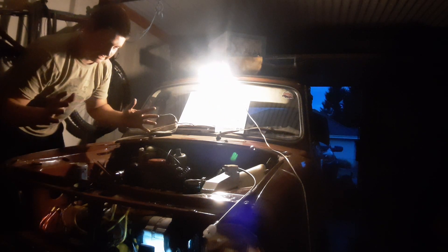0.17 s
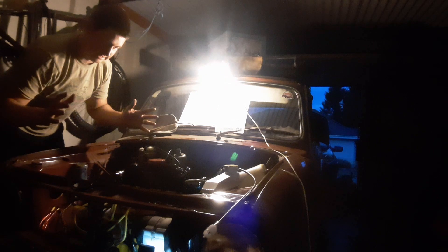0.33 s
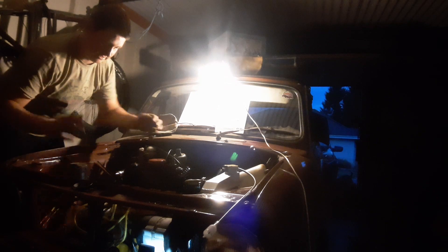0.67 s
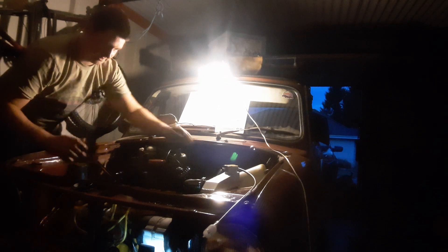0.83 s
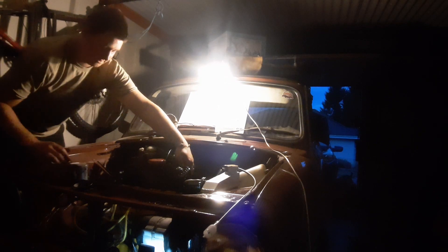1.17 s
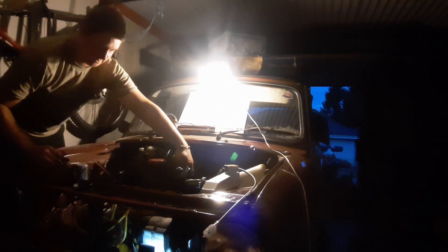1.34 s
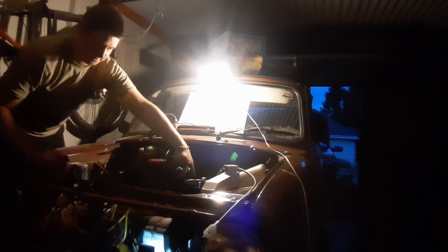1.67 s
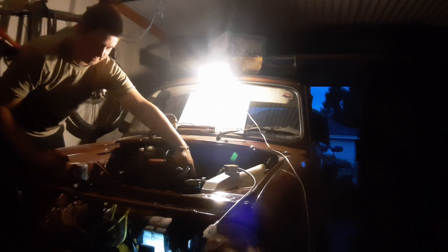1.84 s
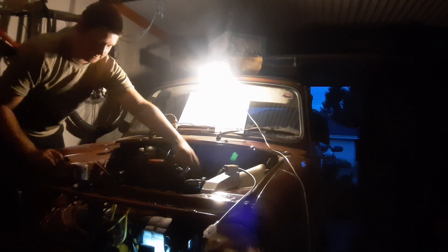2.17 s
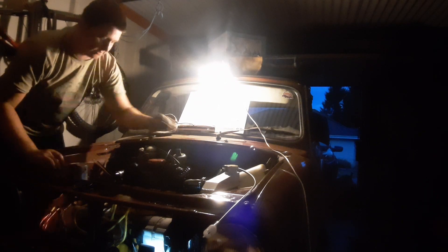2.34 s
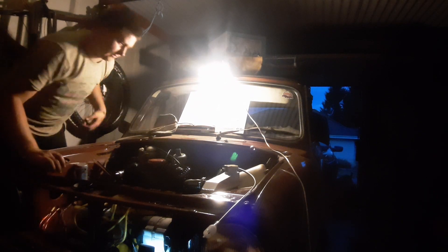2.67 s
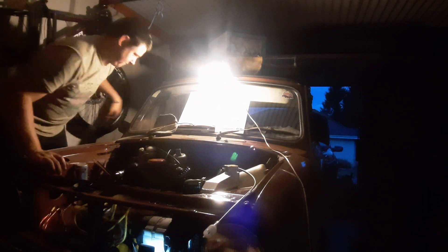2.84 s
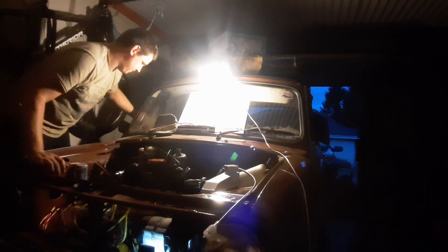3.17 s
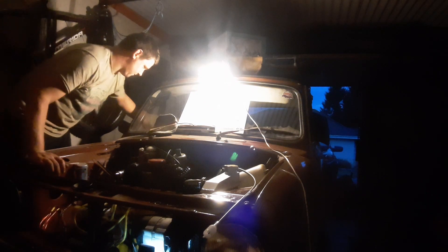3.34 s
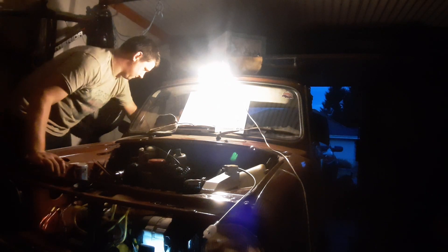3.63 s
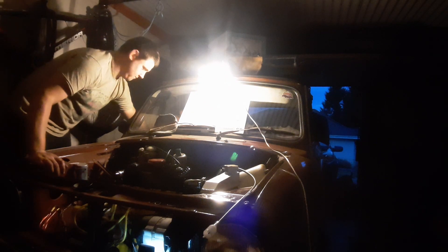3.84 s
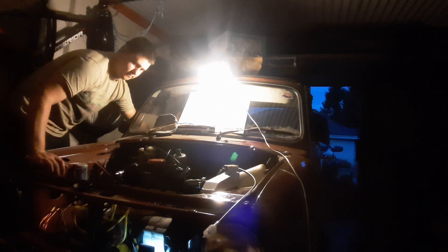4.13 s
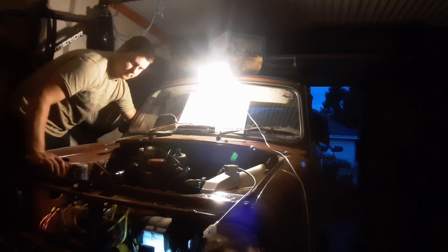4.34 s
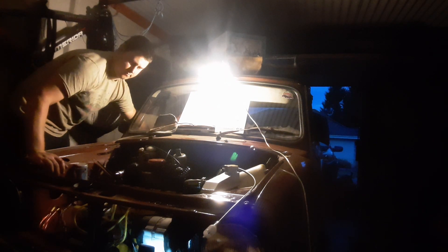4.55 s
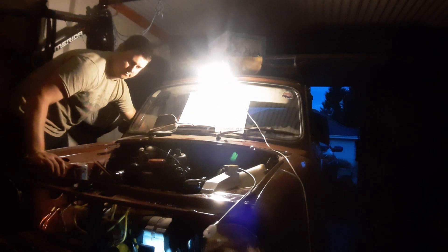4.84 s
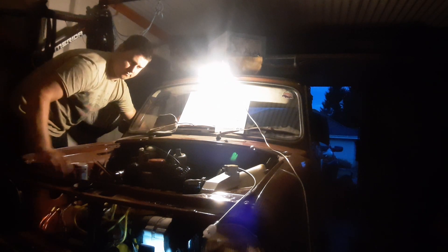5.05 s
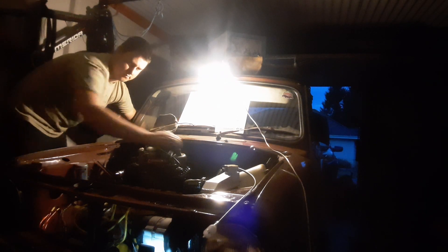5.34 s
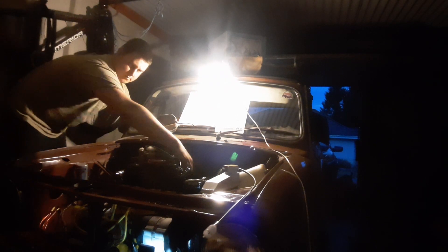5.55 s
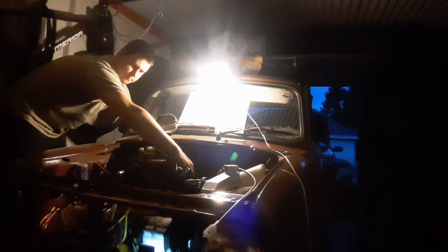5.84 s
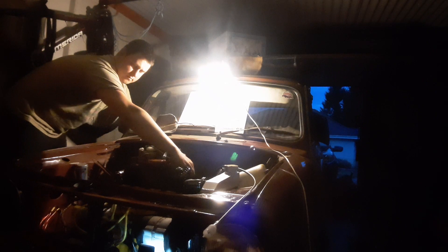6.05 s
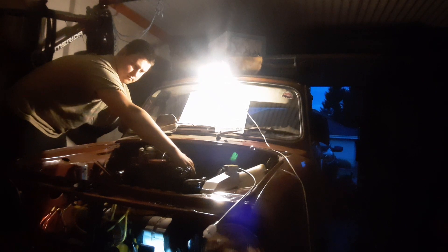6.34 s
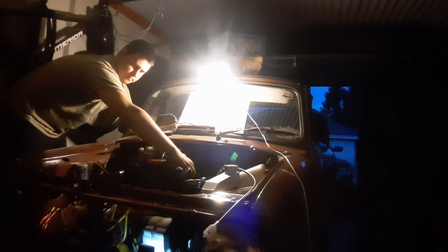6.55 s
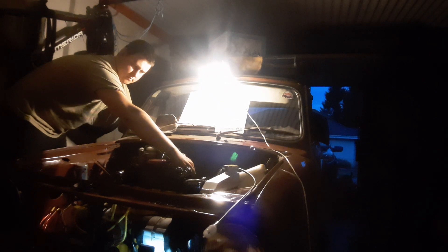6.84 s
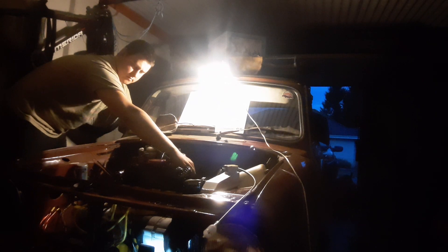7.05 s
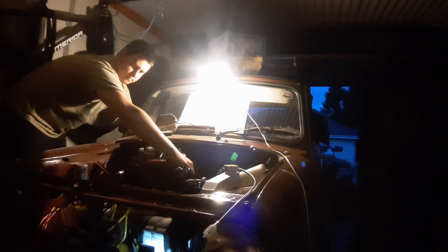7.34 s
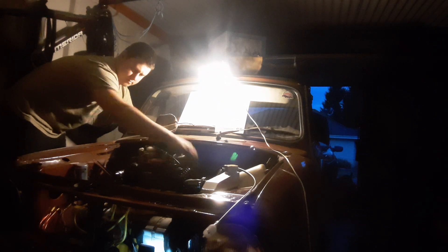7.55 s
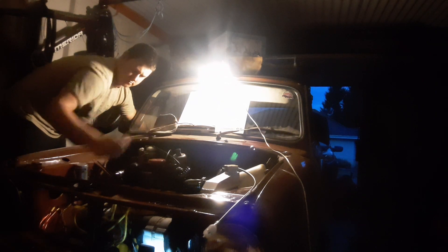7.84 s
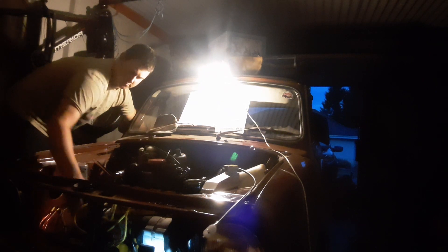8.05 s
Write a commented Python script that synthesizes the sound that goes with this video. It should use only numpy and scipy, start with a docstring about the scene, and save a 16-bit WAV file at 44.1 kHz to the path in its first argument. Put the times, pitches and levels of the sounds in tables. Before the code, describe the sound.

Close stereo pickup of a rough little engine in a short, dense garage echo. It stumbles with low exhaust throbs and ticking metal, then dies around two seconds with a double clack. Quiet follows, with barely audible bumps and a sleeve brush. A toothy, whining starter scrapes for under a second; the engine fires, roars up in two surges, crackles once, falls back and idles faintly.

```python
"""Restarting a small car engine

An old twin-cylinder engine in a garage, bonnet open, stumbles at idle and stalls with a knock. Someone leans in
at the window, the starter grinds, the engine catches, is revved, spits through the carburettor and idles weakly.
Firing pulses excite exhaust resonances; filtered noise, pulsing once a turn, makes block, valve gear and intake air.
Rough contacts are dense random impacts, and struck or hollow parts are noise through narrow resonances."""
import sys
import numpy as np
from scipy import signal
from scipy.fft import rfft, irfft
from scipy.io import wavfile
from scipy.ndimage import uniform_filter1d

SR = 44100
rng = np.random.default_rng(int(sys.argv[2]) if len(sys.argv) > 2 else 0)


def unload_audio(sound):
    """Save the sound as a 16-bit wav file, at the path given as the first command line argument."""
    columns = np.transpose(np.atleast_2d(sound))
    # keep every value between -1 and 1, then stretch to whole-number steps
    steps = np.round(np.clip(columns, -1, 1) * 32767)
    wavfile.write(sys.argv[1], SR, steps.astype(np.int16))


N = 361619
TIME = np.arange(N) / SR  # s

# All table levels are relative: later gains and filters act on them too.
# spectrum of valve gear and intake air: (frequency [Hz], level [dB])
CLATTER_SPECTRUM = [(300, -22), (900, -11), (1200, -2.5), (1550, -2.5), (1850, -10.5), (2400, -2),
                    (2850, 2.5), (3400, -1), (4000, 0), (6000, -1), (7400, 2.5), (8200, -8), (12500, -6),
                    (16000, -7.5)]


def undb(db):
    """Decibels to amplitude: 20 dB is a factor of ten."""
    return 10 ** (np.asarray(db) / 20)


def unit(x):
    """Normalise the effective value: scale to rms 1."""
    return x / np.sqrt(np.mean(x ** 2))


def noise():
    """Diffuse field: white noise whose left and right agree in the bass, less so in the treble."""
    blend_hz = 1110  # below this the sides are alike
    mid, side = rng.standard_normal((2, N))
    side = undb(-2.5) * signal.lfilter(*signal.butter(1, blend_hz, "high", fs=SR), side)
    return np.array([mid + side, mid - side]) / np.sqrt(1.7)


def walk(size):
    """Low-passed chance: a smooth wander of rms 1; size is its time scale in samples."""
    smooth = uniform_filter1d(rng.standard_normal(N), size)
    return unit(uniform_filter1d(smooth, size))


def grit(rate, spread_db):
    """Dry friction as a shot process: dense tiny impacts of uneven size, rate per second, rms 1."""
    impacts = rng.random(N) < rate / SR
    return unit(impacts * noise() * undb(spread_db * noise()))


def steady(x, size=6000):
    """Slow gain control: even out slow level changes (window in samples), keep the faster beats."""
    power = np.mean(np.atleast_2d(x) ** 2, axis=0)
    slow_power = uniform_filter1d(uniform_filter1d(power, size), size)
    return x / np.sqrt(slow_power + 1e-4 * power.mean())


def colour(x, points):
    """Minimum-phase filtering: a causal filter with the (Hz, dB) outline and unit power gain."""
    hz, db = np.transpose(points)
    size = 4096
    bins_hz = np.arange(size // 2 + 1) * SR / size
    gain = undb(np.interp(np.log(bins_hz + 1), np.log(hz), db))
    # folding the cepstrum onto positive times makes the response causal
    cepstrum = irfft(np.log(gain))[:size // 2]
    cepstrum[1:] *= 2
    response = irfft(np.exp(rfft(cepstrum, size)))
    return signal.fftconvolve(x, response[None] / np.linalg.norm(response), axes=1)[:, :N]


def ring(x, modes):
    """Modal superposition: parallel resonances (frequency [Hz], width [Hz], level [dB])."""
    return sum(undb(db) * signal.lfilter(*signal.iirpeak(hz, hz / width, SR), x) for hz, width, db in modes)


def fader(s, db):
    """Piecewise exponential gain: follows a dB curve, fading quickly outside it."""
    outside = np.maximum(s[0] - TIME, 0) + np.maximum(TIME - s[-1], 0)
    return undb(np.interp(TIME, s, db) - np.minimum(600 * outside, 150))


def swell(s, db, rise_db_per_s, fall_db_per_s, length=0):
    """Exponential growth and decay: gain builds up to db at s, holds for length and dies away."""
    early, late = np.maximum(s - TIME, 0), np.maximum(TIME - s - length, 0)
    return undb(db - np.minimum(rise_db_per_s * early + fall_db_per_s * late, 150))


def bursts(table, rise_s, fall_s):
    """Transient envelopes: events rise exponentially, hold for their length and decay exponentially."""
    out = np.zeros(N)
    for s, db, length in table:
        start = int(s * SR)
        age = TIME[:min(SR // 2, N - start)]
        rise = 1 - np.exp(-age / rise_s)
        fall = np.exp(-np.maximum(age - length, 0) / fall_s)
        out[start:start + len(age)] += undb(db) * rise * fall
    return out


def firings(speed, anchor_s, jitter_s, scatter_db):
    """Pulse train from integrated speed: one a crank turn, jittered. Returns (pulses, time since the last [s])."""
    s, hz = np.transpose(speed)
    turns = np.cumsum(np.interp(TIME, s, hz)) / SR
    turns -= np.interp(anchor_s, TIME, turns)  # before jitter, one pulse falls at anchor_s
    times = np.interp(np.arange(np.ceil(turns[0]), turns[-1]), turns, TIME)
    chance = rng.standard_normal((len(times), 2))
    at = np.sort(np.clip((times + jitter_s * chance[:, 0]) * SR, 0, N - 1).astype(int))
    pulses = np.zeros(N)
    pulses[at] = undb(max(scatter_db, 0) * chance[:, 1])
    last = np.maximum(np.searchsorted(at, np.arange(N), side="right") - 1, 0)
    return pulses, np.abs(TIME - at[last] / SR)


def hunting():
    """Speed instability: each surge swells the boom, then the clatter sags twice. Returns (boom gain, clatter gain)."""
    # a few strong firings: (time [s], boom level [dB], depth of the sag after it [dB], negative for a lift)
    surges = [(.06, -47, 4.5), (.31, -64, -1), (.6, -32.5, 2), (.872, -31.5, 3.5), (1.159, -32, 6),
              (1.472, -51, 11.5), (1.736, -38, 10), (5.04, -30, -3.5), (5.331, -42, -1), (5.53, -31, 0),
              (7.22, -45, 2.5), (7.44, -47.5, 1), (7.72, -38, 0)]
    build_db_per_s, drop_db_per_s = 74.5, 167
    # the crank drags just after a surge, and less deeply one turn later
    lag_s, fall_s, rise_s = 0.064, 0.045, 0.05
    again_s, again_share = 0.091, .38

    def sag(s):
        return np.interp(TIME - s - lag_s, [-fall_s, 0, rise_s], [0, 1, 0])

    boom = sum(swell(s, db, build_db_per_s, drop_db_per_s) for s, db, _ in surges)
    sag_db = sum(depth * (sag(s) + again_share * sag(s + again_s)) for s, _, depth in surges)
    return boom, undb(-sag_db)


def engine(pulses, age, effort, swells, sags):
    """Forced resonance: firings boom in the pipe and knock the block; valve gear and air surge. Returns (boom, bay)."""
    # exhaust resonances: (frequency [Hz], width [Hz], level [dB])
    pipe = [(46.1, 3, 5), (79.2, 5.7, 8.5), (115.2, 4.6, 1), (144.3, 4.3, -1.5)]
    # spectrum of the block knock: (frequency [Hz], level [dB])
    block = [(120, -41.5), (200, -10), (240, -0.5), (330, 0.5), (480, 3), (620, -4), (800, -2), (1000, -7),
             (1250, -2.5), (1700, -9), (3000, -42.5)]
    # ringing covers and panels: (frequency [Hz], width [Hz], level [dB])
    covers = [(325, 68, -13), (714, 59, -2), (1150, 128, -1), (1536, 96, -4), (2990, 170, -8),
              (3464, 84, 0), (6750, 375, -10.5)]
    s, boom_db, knock_db, air_db = np.transpose(effort)

    gas_rush = np.exp(-age / 0.028) * rng.standard_normal(N)
    gas = unit(pulses) + undb(-1.5) * unit(gas_rush)
    boom_band = signal.butter(3, [36, 185], "band", fs=SR, output="sos")
    boom = steady(signal.sosfilt(boom_band, ring(gas, pipe)))

    knock = steady(colour((np.exp(-age / 0.0035) + 0.51) * noise(), block))
    surge = age / 0.012 * np.exp(1 - age / 0.017)
    ticks = grit(rate=5000, spread_db=0.7) + undb(-0.5) * noise()
    clatter = steady(colour((surge + 0.78) * ticks, CLATTER_SPECTRUM))
    # above 7 kHz the hiss sags deeper still
    top = signal.sosfiltfilt(signal.butter(1, 7000, "high", fs=SR, output="sos"), clatter)
    clatter = clatter - top * (1 - sags)
    bay = undb(-1.5) * knock * fader(s, knock_db) * sags ** 0.41 + clatter * fader(s, air_db) * sags

    # loose covers each rattle harder or softer from turn to turn
    rattle = sum(ring(bay, [mode]) * undb(6.4 * np.tanh(0.7 * walk(size=700))) for mode in covers)
    running = fader(s, np.zeros(len(s)))
    return boom * np.hypot(fader(s, boom_db), running * swells), undb(0.5) * (bay + rattle)


def fins(x, width_hz, db, flicker_db, count=18):
    """Sympathetic resonance: thin cooling fins of graded length ring, now one and now another."""
    pitches = np.geomspace(2750, 7400, count) * (1 + 0.0082 * rng.standard_normal(count))
    return sum(ring(x, [(hz, width_hz, db)]) * undb(flicker_db * walk(size=1300)) for hz in pitches)


def starter():
    """Tooth-mesh modulation: pinion teeth scrape the flywheel ring in a whine that sags under load, with clashes."""
    # speed, dragged down by the first compressions: (time [s], mean tooth rate [Hz])
    tooth_speed = [(4.38, 500), (4.43, 646), (4.5, 700), (4.571, 556.6), (4.635, 446.1), (4.75, 378.4),
                   (4.82, 784), (5.1, 861), (5.299, 731.5), (5.55, 504)]
    # spectrum of the scrape: (frequency [Hz], level [dB])
    gears = [(80, -10.5), (230, -9.5), (500, -7.5), (820, 4), (1000, 1.5), (1250, 1.5), (2000, 1),
             (2400, -2), (2900, 3), (4500, -4.5), (5600, 1.5), (7200, -2.5), (8400, -14.5), (15500, -16.5)]
    # the flywheel rings under the pinion: (frequency [Hz], width [Hz], level [dB])
    flywheel = [(656, 25, 2.5), (798, 31, 0.5), (990, 58, -3), (1147, 53, -0.5), (4280, 180, 2.5),
                (5150, 110, -5)]
    # the pinion clashes under each compression: (start [s], level [dB], hold [s])
    clashes = [(4.415, -17.5, 0.014), (4.56, -22, 0.065), (4.72, -26.5, 0.021), (4.867, -21.5, 0.025),
               (4.94, -25, 0.016), (5.05, -24.5, 0.029)]
    # the pinion bites hard and howls: (time [s], level [dB])
    bites = [(4.432, -19.5), (4.637, -26.5)]
    on_s, off_s, attack_s = 4.381, 5.05, 0.025
    # the load eases as the engine takes over
    scrape_db, ease_db_per_s, run_down_db_per_s = -23.5, 6.5, 20
    whine_db = -17  # the whine's share of the load

    s, hz = np.transpose(tooth_speed)
    tooth_hz = np.interp(TIME, s, hz) * (1 + 0.0524 * walk(size=200))
    phase = 2 * np.pi * np.cumsum(tooth_hz) / SR
    scrape = colour(grit(rate=11000, spread_db=3.5) * (1 + .5 * np.cos(phase)), gears)
    ringing = sum(ring(scrape, [mode]) * undb(5.7 * walk(size=1100)) for mode in flywheel)
    scrape = unit(scrape + ringing)
    harmonics = np.sin(phase) + 0.32 * np.sin(2 * phase) + 0.74 * np.sin(3 * phase)
    whine = harmonics * undb(3.1 * walk(size=400))

    age, released = np.maximum(TIME - on_s, 0), np.maximum(TIME - off_s, 0)
    engaged = np.minimum(age / attack_s, 1) ** 2
    load = engaged * undb(scrape_db - ease_db_per_s * age - run_down_db_per_s * released)
    howl = sum(swell(at, db, rise_db_per_s=600, fall_db_per_s=450) for at, db in bites)
    rough = scrape * (load + bursts(clashes, rise_s=0.0017, fall_s=0.0038))
    return rough + whine * (undb(whine_db) * load + engaged * howl)


def spits():
    """Cavity resonance: mixture lights in the intake with a hollow cough, and crackles out of the carburettor."""
    # coughs in the intake: (start [s], level [dB], hold [s])
    coughs = [(4.416, -18.5, 0.02), (4.73, -30.5, 0.028), (7.066, -23, 0.026), (7.138, -21.5, 0.01)]
    # intake resonances: (frequency [Hz], width [Hz], level [dB])
    intake = [(240, 59, 5), (262, 51, -9), (345, 120, 3), (489, 25, -4)]
    # spits back through the carburettor: (start [s], level [dB], hold [s])
    crackles = [(7.107, -14.5, 0.019), (7.139, -21.5, 0.022), (7.158, -21, 0.0066)]
    cough = steady(ring(noise(), intake), size=500) * bursts(coughs, rise_s=0.0089, fall_s=0.0086)
    crackle = colour(grit(rate=11000, spread_db=3.5), CLATTER_SPECTRUM)
    return undb(1.0) * cough + crackle * bursts(crackles, rise_s=0.00079, fall_s=0.01)


def bumps():
    """Impact excitation of modes: rattling contacts ring the engine-bay metal or thud in the door."""
    # metal knocks in the engine bay: (start [s], level [dB], hold [s])
    knocks = [(2.01, -55, 0.039), (2.184, -53.5, 0.025), (2.21, -37, 0.0044), (2.22, -36.5, 0.026),
              (7.54, -34.5, 0.032)]
    # modes of the knocked metal: (frequency [Hz], width [Hz], level [dB])
    knock_modes = [(325, 56, -13), (420, 22, 3), (507, 55, -9), (725, 99, -2.5), (950, 54, -3.5),
                   (1310, 62, -12), (1650, 130, -16), (2700, 420, -6)]
    # dull thumps against the door as someone leans in: (start [s], level [dB], hold [s])
    thumps = [(3.151, -53, 0.013), (3.293, -52.5, 0.032), (3.333, -53, 0.076), (3.655, -51.5, 0.015),
              (3.885, -52.5, 0.011), (4.0, -75, 0.11)]
    # spectrum of a thump: (frequency [Hz], level [dB])
    thump_spectrum = [(60, -19), (120, 3.5), (160, 0.5), (230, -3), (330, 1), (520, -2), (850, -8.5),
                      (1100, -8), (1400, -12), (2000, -25), (8000, -51)]
    # door modes: (frequency [Hz], width [Hz], level [dB])
    door = [(146, 36, 8.5), (800, 69, 6.5), (914, 16, 9)]
    metal = sum(undb(db) * steady(ring(noise(), [(hz, width, 0)]), size=900) for hz, width, db in knock_modes)
    metal = metal * bursts(knocks, rise_s=0.0012, fall_s=0.015)
    thuds = colour(noise() * bursts(thumps, rise_s=.0008, fall_s=0.031), thump_spectrum)
    return undb(-5.5) * metal + undb(-3.5) * (thuds + ring(thuds, door))


def sleeve():
    """Stick-slip friction: cloth fibres catch and slip over the door, stroke by stroke."""
    # strokes: (time of full level [s], level [dB], hold [s])
    stroke_table = [(3.326, -65, .09), (3.5, -70, 0.11), (3.676, -49.5, .18), (4.065, -81, .01),
                    (4.14, -73, .02)]
    # spectrum of the cloth: (frequency [Hz], level [dB])
    cloth = [(100, -16), (160, 0), (240, -8), (700, -2), (1100, -2.5), (1700, -7.5), (2800, -3.5),
             (4200, -2), (6000, -3.5), (7500, -2), (8400, -16), (16000, -11)]
    strokes = sum(swell(s, db, 230, 200, length) for s, db, length in stroke_table)  # rise, fall in dB/s
    return colour(grit(rate=6000, spread_db=1.5), cloth) * strokes


def leak():
    """Jet turbulence: a thin hiss seeps from the stalled engine through a narrow gap as its pressure falls."""
    # spectrum of the hiss: (frequency [Hz], level [dB])
    leak_spectrum = [(3000, -19.5), (4500, -10), (5500, -4), (6600, -6), (7600, -22), (12000, -43)]
    start_s, end_s = 2.23, 2.81
    start_db, fade_db_per_s = -65, 23
    end_db = start_db - fade_db_per_s * (end_s - start_s)
    return colour(noise(), leak_spectrum) * fader([start_s, end_s], [start_db, end_db])


def faint_tones():
    """Narrow-band noise wavers like a rough tone: faint rings fade in and out in the lulls."""
    # as the engine runs down, and before the starter:
    # (start [s], level [dB], hold [s], frequency [Hz], width [Hz])
    tones = [(1.9, -61, 0.17, 1443, 35), (4.27, -74, .12, 830, 110)]
    out = 0
    for s, db, length, hz, width in tones:
        tone = steady(ring(noise(), [(hz, width, 0)]), size=900)
        out = out + tone * bursts([(s, db, length)], rise_s=0.024, fall_s=0.043)
    return out


def from_left(x, lag_s):
    """Interaural delay: the right side hears the source later."""
    return np.array([x[0], np.roll(x[1], int(round(lag_s * SR)))])


def garage(x, t60_s, treble_t60_s, wet_db):
    """Reverberation: close hard walls give a short dense echo in which the treble dies first."""
    age = TIME[:SR // 2]
    echoes = noise()[:, :len(age)]
    bass = signal.lfilter(*signal.butter(1, 1200, fs=SR), echoes)
    response = bass * undb(-60 * age / t60_s) + (echoes - bass) * undb(-60 * age / treble_t60_s)
    response /= np.linalg.norm(response[0])
    return x + undb(wet_db) * signal.fftconvolve(x, response, axes=1)[:, :N]


def hush():
    """Stationary background noise: a faint, bass-heavy hush."""
    # spectrum: (frequency [Hz], level [dB])
    quiet = [(15, -50), (25, -2.5), (102, 6), (149, -5), (242, -11.5), (463, -12.5), (911, -13),
             (1890, -21.5), (9570, -23.5), (13200, -20.5), (16000, -25)]
    return undb(-71.5) * colour(noise(), quiet)


def scene():
    """Linear superposition: both runs, the starter and the small noises in the garage, over the hush."""
    # engine speed before the stall and after the restart: (time [s], mean firing rate [Hz])
    first_speed = [(0, 12.5), (.2, 13), (.45, 16.8), (.65, 15), (1.1, 13.8), (1.45, 12.7), (1.8, 10.3),
                   (2.18, 5)]
    second_speed = [(4.4, 8.6), (4.7, 14.9), (5.08, 17.6), (5.55, 20.5), (5.95, 19.4), (6.7, 24.1),
                    (7.08, 23.7), (7.16, 14.3), (7.55, 14.3), (8.2, 19.7)]
    # how hard the engine works:
    # (time [s], exhaust boom [dB], block knock [dB], clatter and intake air [dB])
    first_run = [(0, -47, -53.5, -45.5), (.31, -47, -55, -47), (.52, -54, -45.5, -36), (.8, -53, -43, -34),
                 (1.3, -42, -44, -34), (1.76, -38, -43, -35), (1.859, -50, -46, -38), (1.94, -55, -65, -59),
                 (2.17, -79, -78, -77)]
    second_run = [(4.72, -47, -39, -34), (4.85, -36.5, -43, -29.5), (5.1, -42, -33, -31),
                  (5.3, -33.5, -40, -31.5), (5.98, -35.5, -40, -32.5), (6.22, -29.5, -36.5, -29),
                  (6.6, -29.5, -33, -26), (7.08, -30, -34.5, -29), (7.2, -34.5, -40.5, -27),
                  (7.33, -60, -49.5, -37), (7.55, -46.5, -51, -43.5), (8.2, -44.5, -49.5, -41.5)]
    engine_lag_s, side_lag_s = .00008, 0.0002  # longer for what lies further left

    swells, sags = hunting()
    first = firings(first_speed, anchor_s=1.0, jitter_s=.0012, scatter_db=0.0)
    second = firings(second_speed, anchor_s=7.315, jitter_s=.0007, scatter_db=1.5)
    boom1, bay1 = engine(*first, first_run, swells, sags)
    boom2, bay2 = engine(*second, second_run, swells, sags)
    metal = from_left(bay1 + bay2 + spits(), engine_lag_s) + from_left(starter(), side_lag_s)
    near = metal + fins(metal, width_hz=67, db=-9.5, flicker_db=7)
    near = near + from_left(bumps(), side_lag_s) + sleeve() + leak() + faint_tones()
    room = garage(near, t60_s=0.3, treble_t60_s=0.13, wet_db=-4.5)
    boom = from_left([boom1 + boom2] * 2, side_lag_s)
    return room + boom + hush()


def record(dry):
    """Saturation and band limiting: the highest peaks are rounded and the top is cut."""
    top_hz = 15800
    rounded = np.tanh(1.23 * dry) / 1.15
    return signal.sosfilt(signal.ellip(10, .2, 80, top_hz, fs=SR, output="sos"), rounded)


dry = scene()
out = record(dry)
unload_audio(out)
```